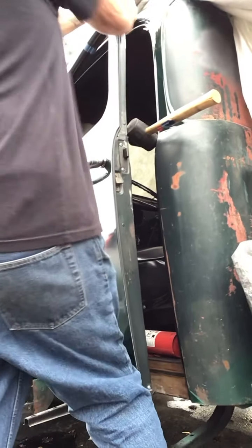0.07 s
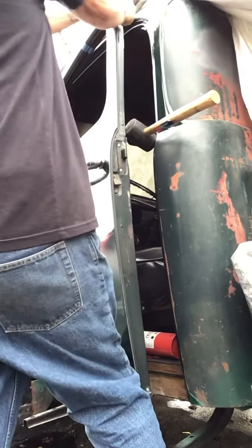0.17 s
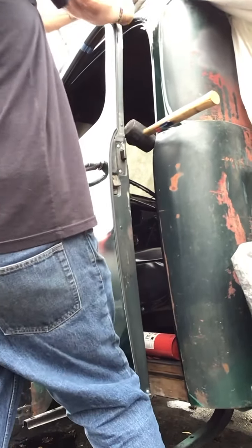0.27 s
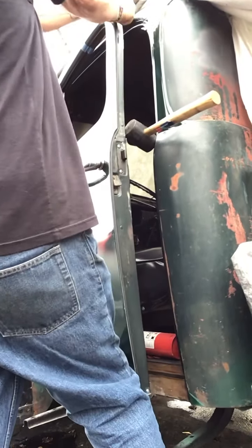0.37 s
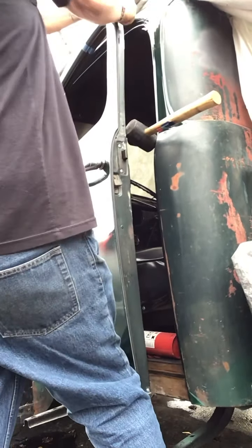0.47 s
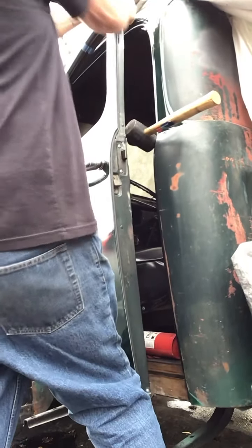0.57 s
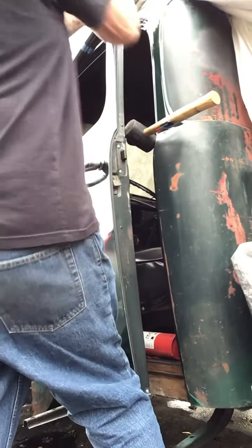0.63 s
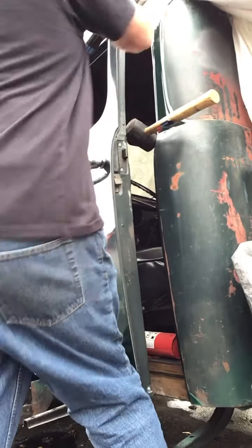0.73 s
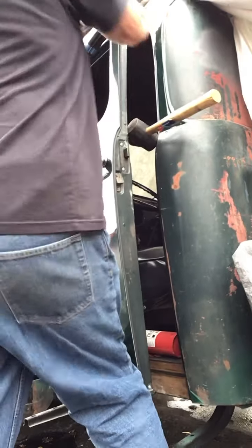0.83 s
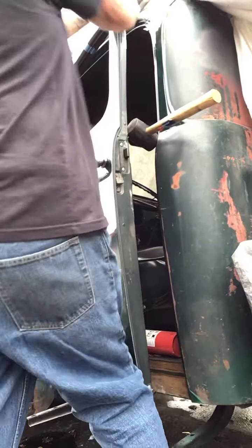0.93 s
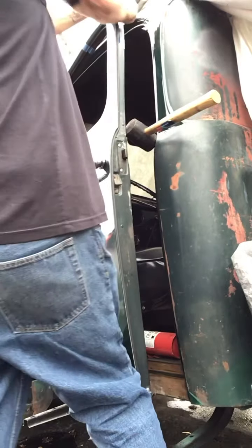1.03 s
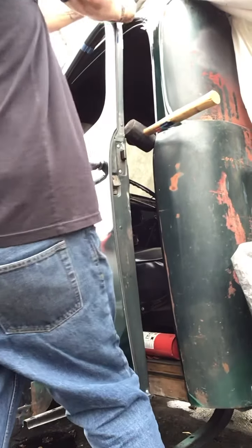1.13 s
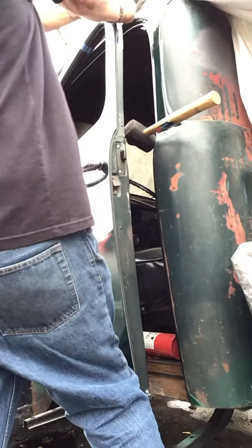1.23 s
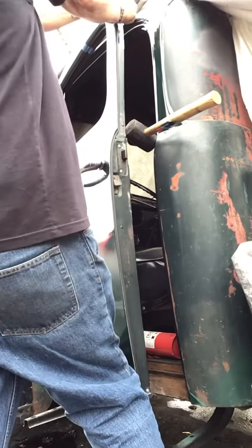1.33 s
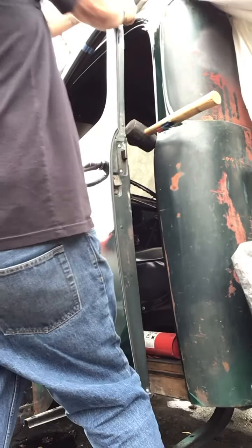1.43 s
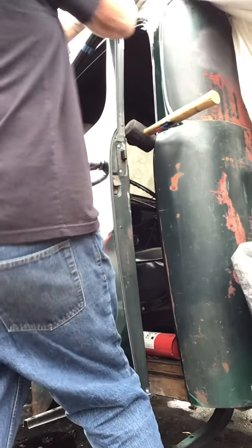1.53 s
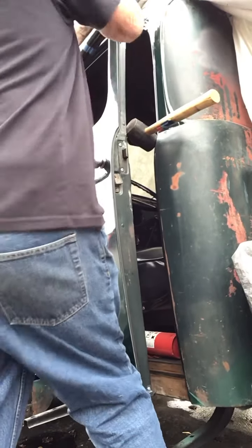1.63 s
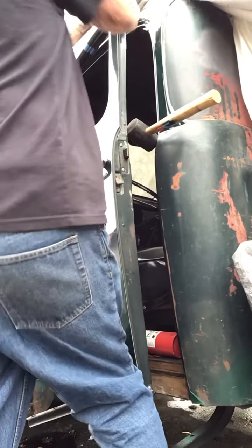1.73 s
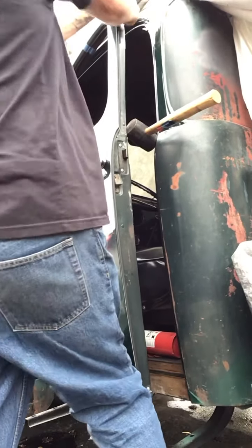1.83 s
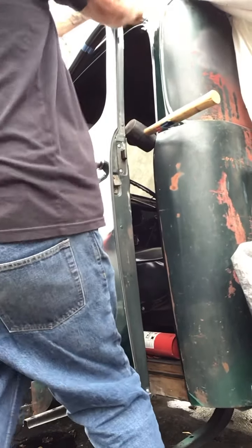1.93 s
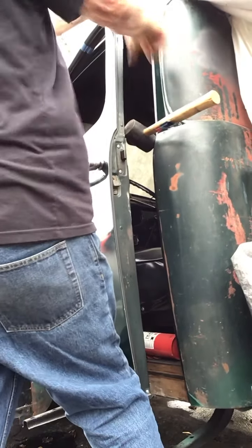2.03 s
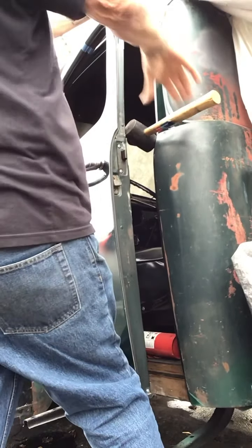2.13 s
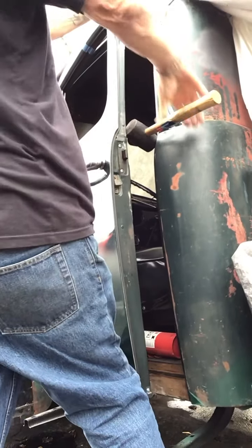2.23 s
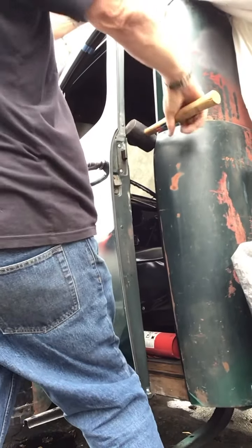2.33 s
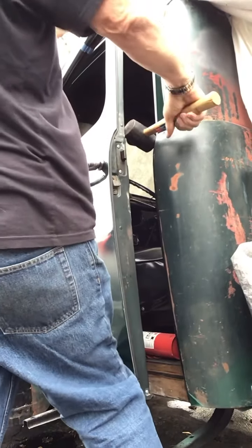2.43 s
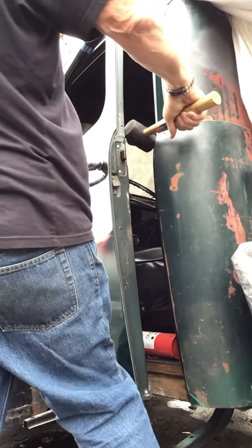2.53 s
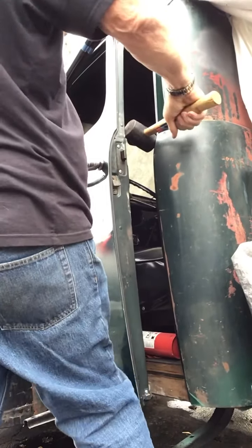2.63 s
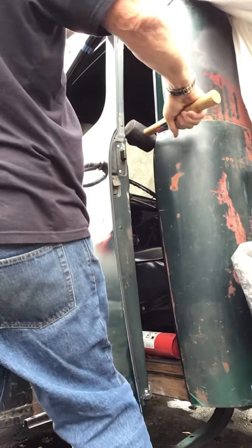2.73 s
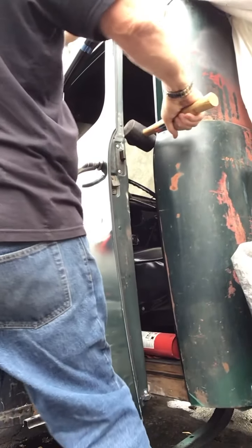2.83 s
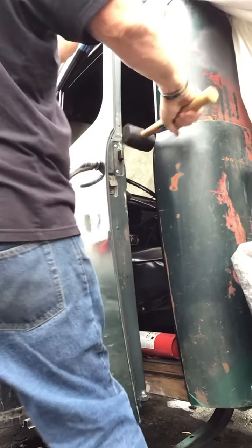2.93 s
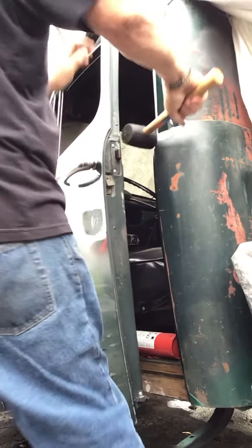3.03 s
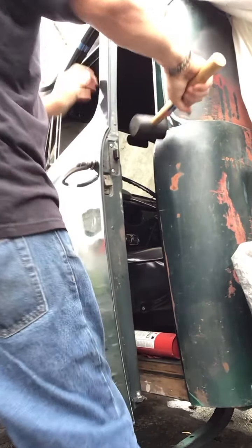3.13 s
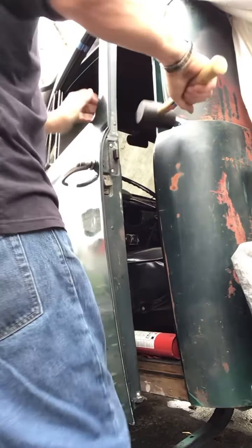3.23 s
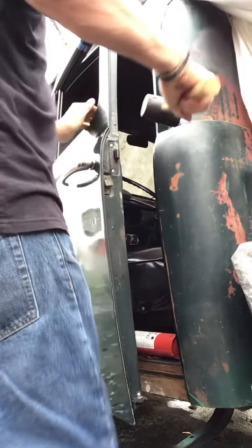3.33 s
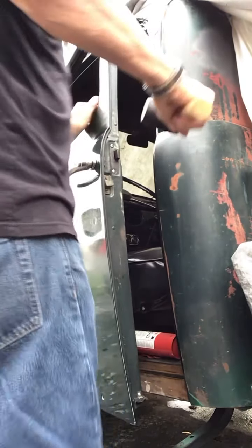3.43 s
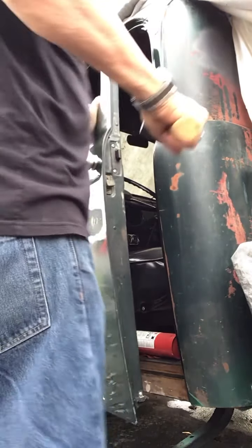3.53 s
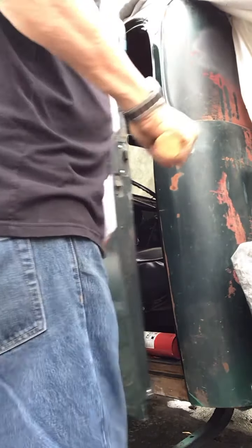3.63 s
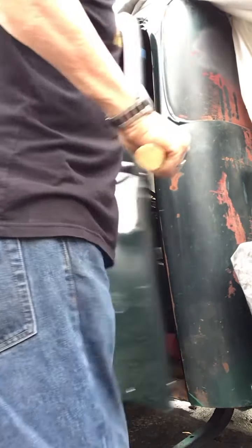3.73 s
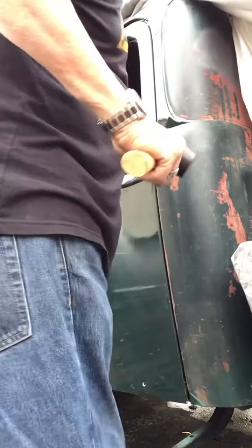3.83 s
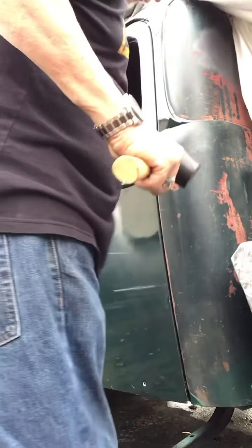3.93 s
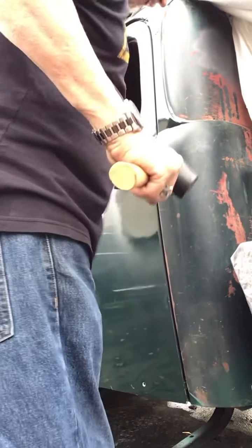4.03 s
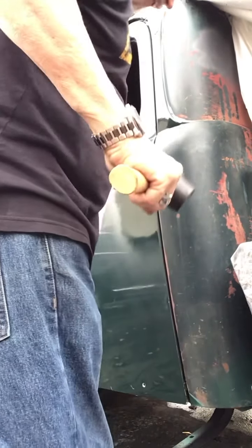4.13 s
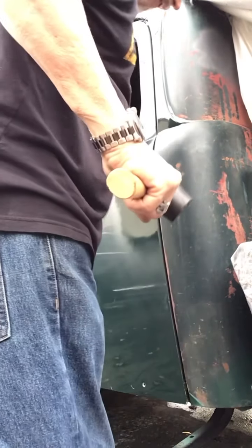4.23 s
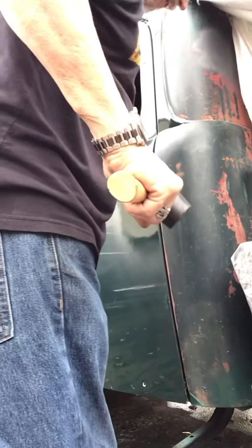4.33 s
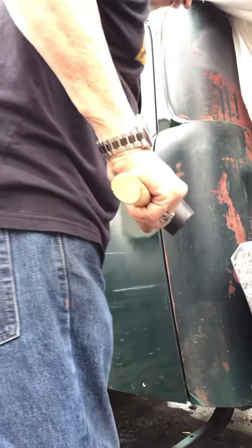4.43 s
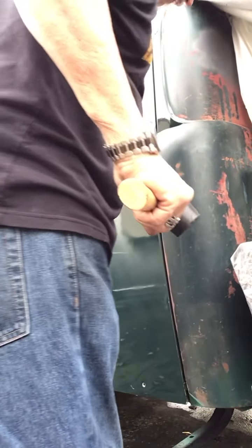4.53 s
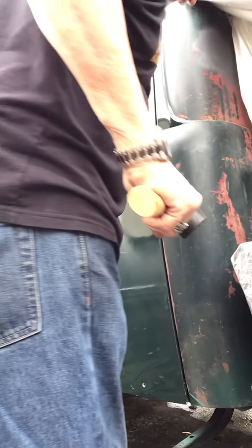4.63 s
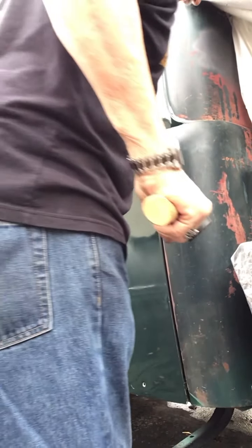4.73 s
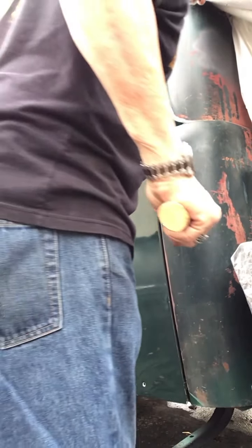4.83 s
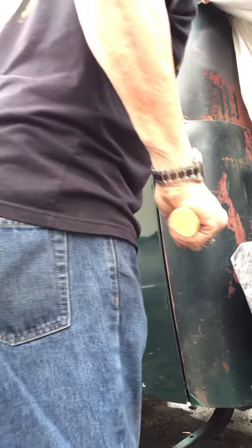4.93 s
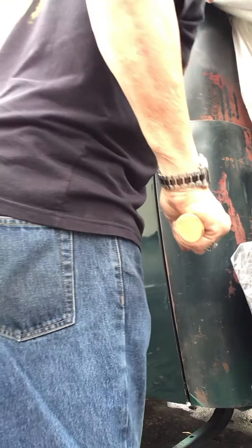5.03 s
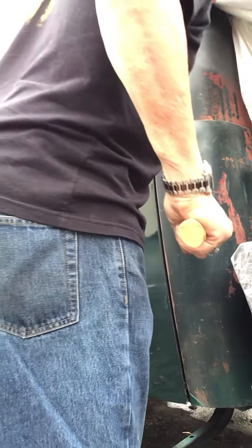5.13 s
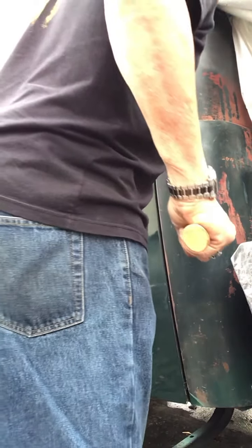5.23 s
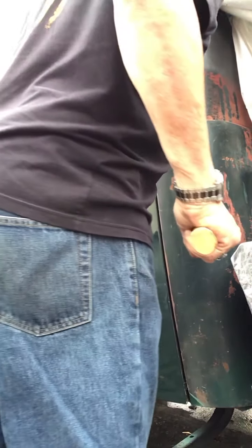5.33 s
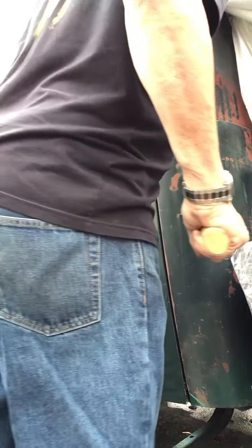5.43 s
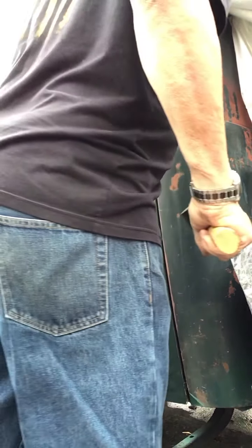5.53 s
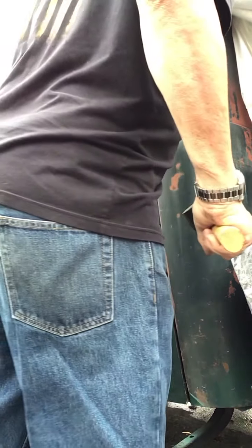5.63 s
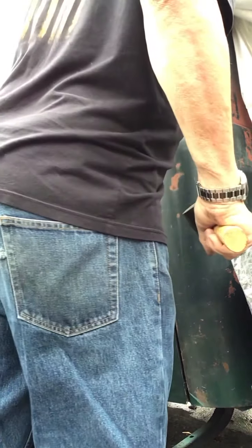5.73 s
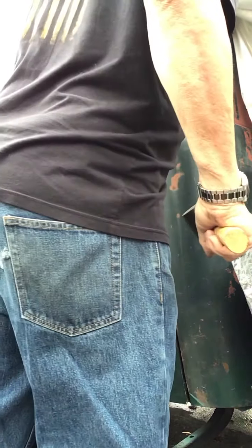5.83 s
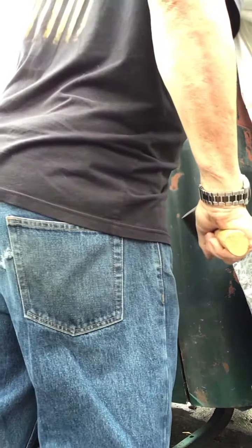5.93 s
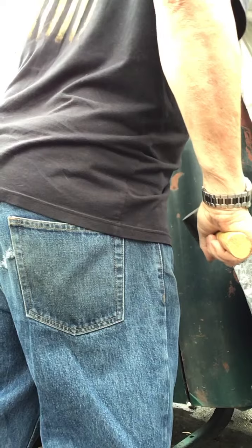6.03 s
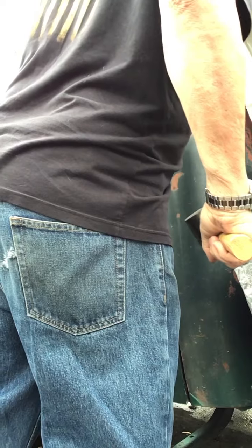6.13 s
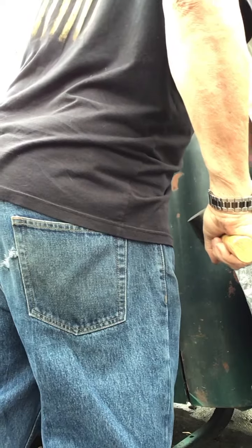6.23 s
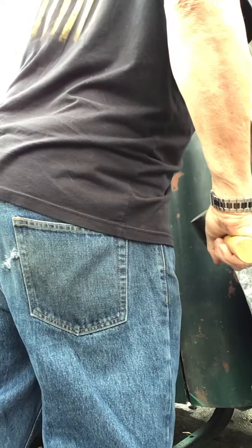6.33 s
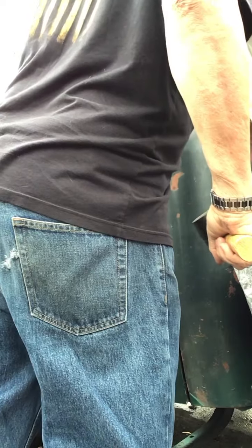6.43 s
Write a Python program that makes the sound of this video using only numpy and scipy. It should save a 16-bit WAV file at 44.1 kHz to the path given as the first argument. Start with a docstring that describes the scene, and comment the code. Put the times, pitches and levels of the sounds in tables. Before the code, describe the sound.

Phone-like close pickup of an old vehicle door. Quiet muffled bumps, frame knocks and tiny clicks come first over distant traffic, with very faint thin bird whistles. A wooden-handled mallet is lifted with a thud and scraping clicks; grit scuffs; one very loud metallic slam bursts out, several latch contacts in quick succession, hollow body resonance dying within about a second. Then near quiet, a soft bump and sparse ticks.

```python
"""Steel truck door slam

A heavy door is nudged, a mallet slides off it, a shoe scuffs on grit, then the door slams: noise clashes and
sine clangs of latch and striker, damped panel modes, a dense noise ring of the shell, rattling pings.
Traffic rumbles as filtered noise, a small bird pipes in gliding sines, a yard echoes,
and the phone's gain control ducks after the bang.
"""
import sys
import numpy as np
from scipy import signal
from scipy.fft import rfft, irfft, next_fast_len
from scipy.io import wavfile
from scipy.ndimage import uniform_filter1d, map_coordinates

SR = 44100
rng = np.random.default_rng(int(sys.argv[2]) if len(sys.argv) > 2 else 0)


def magnitude_from_level(level_db):
    """Linear magnitude for a level in decibels (20 dB per decade)."""
    exponent = np.asarray(level_db, float) / 20
    return 10 ** exponent


def put_to_file(sound):
    """Save the sound as 16-bit audio at rate SR, in the file named by the first command-line argument."""
    columns = np.atleast_2d(sound).T  # one column per channel
    safe = np.clip(columns, -1, 1)
    whole_steps = np.round(safe * 32767)
    wavfile.write(sys.argv[1], SR, whole_steps.astype(np.int16))


N = 286650

# latch and striker contacts of the slam: (t/s, clash level/dB, clang level/dB)
CONTACTS = [(3.6901, -17, -24), (3.692, -16, -7), (3.701, -15.5, -18.5), (3.7037, -11, -12),
            (3.715, -26.5, -26.5), (3.718, -19.5, -30), (3.724, -16, -28.5), (3.731, -23.5, -27)]


def unit(x):
    """Scaled to rms 1."""
    return x / np.sqrt(np.mean(x ** 2) + 1e-20)


def along(points, hz):
    """(f/Hz, value) points interpolated on a log frequency axis."""
    f, v = np.transpose(points)
    return np.interp(np.log(hz + 1), np.log(f + 1), v)


def wobble(knots_per_s):
    """Smooth random curve over the whole scene."""
    knots = rng.standard_normal(int(N * knots_per_s / SR) + 4)
    return map_coordinates(knots, [np.arange(N) * knots_per_s / SR])


def short_wobble(t, knots_per_s):
    """Smooth random curve of 40 knots over the times t."""
    return map_coordinates(rng.standard_normal(40), [t * knots_per_s])


def decay(t, t60_s):
    """Exponential decay, 60 dB in t60_s."""
    return magnitude_from_level(-60 * t / t60_s)


def onset(t, tau_s):
    """Exponential approach to 1."""
    return 1 - np.exp(-t / tau_s)


def sine(t, hz, phase=0):
    """Sine at hz with an added phase in radians."""
    return np.sin(2 * np.pi * hz * t + phase)


def filtered(x, response):
    """x times a response of frequency."""
    size = next_fast_len(len(x) + 8192)
    spectrum = rfft(x, size) * response(np.fft.rfftfreq(size, 1 / SR))
    return irfft(spectrum, size)[:len(x)]


def coloured(spectrum, size):
    """Noise of rms 1 with the given spectrum."""
    return unit(filtered(rng.standard_normal(size), lambda hz: magnitude_from_level(along(spectrum, hz))))


def band(x, centre_hz, octaves):
    """x through a band bell-shaped in log frequency, rms 1."""
    def bell(hz):
        return np.exp(-.5 * (np.log2((hz + 1) / centre_hz) / abs(octaves)) ** 2)
    return unit(filtered(x, bell))


def dying(x, t60s):
    """Each frequency of x decays at its own rate."""
    hz, t, z = signal.stft(x, SR, nperseg=256)
    z = z * magnitude_from_level(-60 * t / along(t60s, hz)[:, None])
    return signal.istft(z, SR, nperseg=256)[1][:len(x)]


def add(track, s, sound):
    """Mixes a sound into the track at time s."""
    part = track[round(s * SR):][:len(sound)]
    part += sound[:len(part)]


def street():
    """Traffic rumble in slow lumps over a smooth far wash, both filtered noise."""
    # rumble level: (t/s, level/dB)
    traffic = [(0, -39), (.45, -39.5), (0.899, -44.5), (1.6, -43), (2.2, -44.5), (3.0, -47), (3.55, -48),
               (4.95, -49.5), (5.6, -48), (6.5, -47.5)]
    # rumble spectrum: (f/Hz, relative density/dB)
    rumble_spectrum = [(15, -72.5), (25, -42), (32, -35.5), (34, -22), (41, -30.5), (59, 3), (102, 2),
                       (250, -24.5), (320, -46.5), (550, -120)]
    # far wash spectrum: (f/Hz, relative density/dB)
    air_spectrum = [(59, -30), (100, -0.5), (119, -0.5), (181, -5), (260, -10.5), (343, -5.5), (365, -13.5),
                    (784, -16.5), (854, -18), (1450, -22), (2370, -31.5), (16000, -49)]
    air_db = -52
    level_db = np.interp(np.arange(N) / SR, *np.transpose(traffic))
    lumps = magnitude_from_level(1.7 * wobble(2.8))
    rumble = magnitude_from_level(level_db) * unit(lumps * coloured(rumble_spectrum, N))
    swell_db = .6 * wobble(2.5) + .5 * wobble(11)
    return rumble + magnitude_from_level(air_db + swell_db) * coloured(air_spectrum, N)


def bird():
    """Thin sine whistles that rise, then drop faintly, with a rough pitch flutter."""
    # notes: (t/s, rise/s, first f/Hz, top f/Hz, level/dB)
    notes = [(1.883, .086, 7950, 9170, -66), (2.048, .097, 8300, 9120, -66), (2.238, .082, 8250, 9050, -67),
             (5.85, .052, 8060, 9200, -75)]
    fall_s, fall_hz, fall_db = .03, 1400, 7
    start_db = 5  # a note begins this much softer
    bend = 1.6  # the rise flattens towards the top
    out = np.zeros(N)
    for s, rise_s, first_hz, top_hz, db in notes:
        t = np.arange(0, rise_s + fall_s, 1 / SR)
        fall = np.clip((t - rise_s) / fall_s, 0, 1)
        to_go = np.clip(1 - t / rise_s, 0, 1)
        hz = top_hz - (top_hz - first_hz) * to_go ** bend - fall_hz * fall
        flutter = 1 + .011 * wobble(420)[:len(t)]
        start = np.clip(1 - 2 * t / rise_s, 0, 1)
        swell_db = 3.8 * wobble(150)[:len(t)] - fall_db * fall - start_db * start
        swell = signal.windows.tukey(len(t), .5) * magnitude_from_level(swell_db)
        whistle = np.sin(2 * np.pi * np.cumsum(hz * flutter) / SR)
        add(out, s, np.sqrt(2) * magnitude_from_level(db) * swell * whistle)
    return out


def scuffs(pings_per_s=2500, cycles=5.0, size_db=13, hiss=1.0):
    """Shoes, cloth and loose parts rub: tiny pings of scattered pitch, as of slipping grit, over a hiss."""
    # strokes: (t/s, length/s, level/dB, f/Hz, rise/s)
    strokes = [(.785, .058, -69, 5030, .017), (1.035, .014, -60.5, 7600, .004),
               (1.05, 0.14, -67, 1490, .01), (1.053, 0.065, -71.5, 8050, 0.0033),
               (1.188, .1, -73, 11000, .02), (1.818, .15, -61, 1760, 0.017),
               (1.823, 0.078, -67.5, 9100, .01), (1.89, 0.41, -69.5, 11300, .03),
               (2.351, .063, -67, 7800, .015), (3.025, .072, -56.5, 4400, 0.018),
               (3.304, .04, -58, 4730, .004), (3.538, .2, -53.5, 4770, .057),
               (3.794, .17, -56, 4500, 0.046), (4.046, .07, -60, 2820, 0.015),
               (5.242, .2, -76.5, 6000, .04), (5.255, .05, -69, 2500, 0.016), (6.02, .18, -76, 2800, .05),
               (5.715, .06, -74, 11000, 0.017), (6.322, .095, -62, 3850, 0.05),
               (6.408, .041, -62, 4080, 0.0076)]
    octaves = .8
    out, t = np.zeros(N), np.arange(200) / SR
    for s, length_s, db, hz, rise_s in strokes:
        size = round(length_s * SR)
        when, tune, loud = rng.random((3, int(pings_per_s * length_s)))
        pitch = np.clip(hz * 2 ** (1.5 * octaves * (2 * tune - 1)), 300, 15500)[:, None]
        pings = magnitude_from_level(size_db * loud[:, None] ** 3) * np.exp(-t * pitch / cycles) * sine(t, pitch)
        spots = (when * size).astype(int)[:, None] + np.arange(len(t))
        grit = unit(np.bincount(spots.ravel(), pings.ravel(), size + len(t))[:size])
        rub = unit(grit + hiss * band(rng.standard_normal(size), hz, octaves))
        u = np.linspace(0, 1, size)
        stroke = np.clip(u * length_s / rise_s, 0, 1) * np.clip((1 - u) / 0.25, 0, 1)
        add(out, s, magnitude_from_level(db) * stroke * rub)
    return out


def squeaks():
    """Narrow squeaks of door parts: thin bands of noise with soft ends."""
    # (t/s, length/s, level/dB, f/Hz, width/octaves)
    parts = [(0.725, 0.045, -66.5, 2890, .08), (1.066, .06, -64, 2006, .05), (1.07, 0.11, -69, 2330, .09),
             (1.88, .04, -64, 2560, .05), (3.68, 0.017, -45, 2860, .033), (3.83, 0.055, -49.5, 5200, .033),
             (3.827, 0.027, -45.5, 2910, .033)]
    out = np.zeros(N)
    for s, length_s, db, hz, octaves in parts:
        size = round(length_s * SR)
        squeak = band(rng.standard_normal(size), hz, octaves)
        add(out, s, magnitude_from_level(db) * signal.windows.tukey(size, .5) * squeak)
    return out


def ticks(tone=0.14):
    """Short noisy rings of mallet, metal and grit; longer rings have narrower bands and clearer tones."""
    # ticks and thuds: (t/s, peak level/dB, f/Hz, t60/s)
    listed = [(.142, -52, 13000, .01), (.144, -53.5, 5800, 0.11), (.636, -45, 9700, 0.0054),
              (.71, -61.5, 12500, .06), (.909, -58, 14200, .012), (1.446, -58, 9800, .01),
              (1.515, -57, 12400, 0.034), (1.76, -59, 7630, .012), (1.906, -57, 5230, .02),
              (2.405, -50.5, 4240, 0.014), (2.878, -32.5, 129, 0.19), (2.931, -43.5, 11350, 0.02),
              (2.967, -32.5, 125, 0.43), (2.975, -45.5, 3670, 0.065), (2.997, -53, 11000, .012),
              (3.228, -29, 3000, 0.01), (3.234, -32, 3320, 0.026), (3.243, -38, 1400, .02),
              (3.266, -37, 2700, .03), (3.282, -34, 11100, 0.044), (3.286, -35, 9500, 0.044),
              (3.296, -39, 13300, .03), (3.299, -29.5, 6700, 0.031), (3.299, -28.5, 3880, 0.022),
              (3.318, -37, 401, 0.031), (5.817, -57, 7530, 0.02), (6.371, -55.5, 9000, .012),
              (6.423, -55, 8530, .015)]
    dry_t60_s, dry_octaves = .01, 0.51  # the reference dry tick and its band
    narrowing = 0.41  # power of t60 by which the band narrows
    strays_per_s, stray_floor_db = 1.8, -63.5
    out, t = np.zeros(N), np.arange(SR // 6) / SR
    strays = []  # faint dry ticks at random times
    for when, loud, tune in rng.random((int(strays_per_s * N / SR), 3)):
        strays.append((when * N / SR, stray_floor_db + 6 * loud, 6000 * 2 ** tune, dry_t60_s))
    for s, db, hz, t60_s in listed + strays:
        octaves = dry_octaves * (dry_t60_s / t60_s) ** narrowing
        ring = band(rng.standard_normal(len(t)), hz, octaves) + tone / octaves * sine(t, hz)
        ring = ring * decay(t, t60_s) * onset(t, 0.00073)
        add(out, s, magnitude_from_level(db) * ring / np.abs(ring).max())
    return out


def drag():
    """The mallet head slides off the door edge: an uneven stick-slip rasp through edge resonances."""
    # rasp spectrum: (f/Hz, relative density/dB)
    rasp_spectrum = [(240, -40), (400, -1.5), (1090, -6.5), (2000, -6.5), (3400, -7.5), (8000, -8.5),
                     (14100, -15), (16000, -31)]
    # edge resonances: (f/Hz, width/Hz, level above the rasp/dB)
    resonances = [(1650, 98, -3), (2700, 230, 6.5), (3170, 150, 3), (4070, 230, 6)]
    start_s, length_s, level_db = 3.214, .098, -41
    slips_per_s, slip_db = 260, 2
    out, t = np.zeros(N), np.arange(round(length_s * SR)) / SR

    def edge(f):
        return 1 + sum(magnitude_from_level(db) / (1 + (2 * (f - hz) / width) ** 2) for hz, width, db in resonances)

    slips = magnitude_from_level(slip_db * wobble(2 * slips_per_s)[:len(t)])  # two knots a slip
    rasp = filtered(coloured(rasp_spectrum, len(t)), edge) * slips
    stroke = np.clip(t / 0.013, 0, 1) * np.clip((t[-1] - t) / .012, 0, 1)
    add(out, start_s, magnitude_from_level(level_db) * stroke * unit(rasp))
    return out


def knocks():
    """Knocks ring the same window-frame modes, slightly rough, under a dry rap; loud contact, faint tail."""
    # frame modes: (f/Hz, level/dB, t60/s)
    frame = [(644, 0.5, 0.23), (1040, -3, .07), (1520, -1, 0.09), (1790, -9, .06), (2054, 0.5, 0.076),
             (2410, -7.5, 0.048), (2560, -6, 0.11), (2890, -4, 0.14)]
    # knocks; the spot struck favours modes near one pitch: (t/s, level/dB, favoured f/Hz)
    strikes = [(1.052, -41.5, 1660), (1.057, -44, 620), (1.54, -56, 2660), (1.816, -49.5, 1860),
               (1.829, -38.5, 850), (1.841, -52, 1600), (1.862, -53, 1900), (1.905, -66, 2200)]
    favour_octaves = 0.44
    out, t = np.zeros(N), np.arange(SR // 5) / SR
    for s, knock_db, favoured_hz in strikes:
        ring = 0
        for hz, db, t60_s in frame:
            favour = np.exp(-.5 * (np.log2(hz / favoured_hz) / favour_octaves) ** 2)
            mode = sine(t, hz, 1.75 * short_wobble(t, 150))
            ring = ring + magnitude_from_level(db) * decay(t, t60_s) * favour * mode
        rap = .5 * decay(t, 0.03) * band(rng.standard_normal(len(t)), favoured_hz, 0.48)
        knock = ring * (0.59 + decay(t, 0.018)) + rap
        add(out, s, magnitude_from_level(knock_db) * knock * onset(t, .001))
    return out


def rattle():
    """Loose parts of window and linkage, shaken by the slam: uneven pings that die away."""
    # pitches before random detuning: (f/Hz, relative level/dB)
    loose = [(1250, 0), (1700, -2), (2400, -4), (2900, -2.5), (4070, -6), (5200, -4.5), (6400, -8)]
    pings_per_s, length_s, base_db = 540, 0.3, -27
    rattle_t60_s, ping_t60_s = .45, 0.02
    out, t = np.zeros(N), np.arange(SR // 30) / SR
    for when, which, loud, tune in rng.random((int(pings_per_s * length_s), 4)):
        hz, db = loose[int(which * len(loose))]
        delay_s = when * length_s
        detuned_hz = hz * (1 + 0.077 * (tune - .5))
        ping = decay(t, ping_t60_s) * sine(t, detuned_hz) * onset(t, 0.00056)
        ping_db = base_db + db + 11.1 * loud ** 2 - 60 * delay_s / rattle_t60_s
        add(out, CONTACTS[0][0] + delay_s, magnitude_from_level(ping_db) * ping)
    return out


def shell(ring_db=-13.5, rise_s=0.025):
    """Too many modes to count: a dense noise ring in uneven clusters that builds after first contact."""
    # ring of shell and cab: (f/Hz, relative density/dB)
    spectrum = [(59, -47.5), (100, -16.5), (202, -13), (335, -6), (784, -18), (891, -17.5), (1830, -24),
                (2000, -24.5), (4980, -32.5), (13800, -39), (16000, -48.5)]
    # decay: (f/Hz, t60/s)
    t60s = [(100, 3.3), (200, 0.84), (400, 0.61), (1000, 0.54), (4000, 0.51), (8000, 0.49), (15000, 0.44)]
    out, t = np.zeros(N), np.arange(3 * SR // 2) / SR
    z = signal.stft(coloured(spectrum, len(t)), nperseg=256)[2]
    clusters = uniform_filter1d(rng.standard_normal(z.shape), size=3, axis=0)  # over frequency
    clusters = uniform_filter1d(clusters, size=5, axis=1)  # over time
    patchy = signal.istft(z * magnitude_from_level(1.2 * unit(clusters)), nperseg=256)[1][:len(t)]
    ring = dying(unit(patchy), t60s)
    add(out, CONTACTS[0][0], magnitude_from_level(ring_db) * ring * onset(t, rise_s))
    return out


def panel(waver_rad=1.0):
    """Long contacts feed mainly low modes, damping shortens them; each wavers like a cluster of modes."""
    # modes: (f/Hz, level/dB, t60 at damping 1/s)
    modes = [(54, -4, 0.36), (69.7, -8.5, 2.25), (77.8, -4.5, .5), (90, -10.5, 1.1), (110, -12, 1),
             (134.3, -0.5, 0.6), (168, -6.5, 0.9), (184.8, -9, 0.9), (224.8, -7.5, 0.75), (257, -4, 0.55),
             (314.8, 0.5, 0.4), (363, -6, 0.72), (405, -16, 0.47), (455, -15, 0.5), (553, -17, 0.6),
             (620, -6, 0.15)]
    # blows: (t/s, level/dB, contact/s, damping by hand and seal/ratio)
    blows = [(0.589, -41, 0.0019, 1.66), (0.661, -40, 0.0017, 3.6), (0.811, -33, 0.0051, 2.3),
             (1.054, -46, 0.0012, 3.3), (1.514, -33, 0.0038, 4.4), (1.816, -44, 0.00074, 3.6),
             (2.872, -34, 0.0024, 2.35), (2.93, -41, 0.0014, 5.8), (3.702, -8.5, 0.0024, 1.93),
             (3.717, -14, 0.0039, 0.95), (3.728, -17.5, 0.0048, 1.1), (4.692, -31, 0.0059, 3.8)]
    beat_db = 2.5  # scale of each mode's swelling and sinking
    out, t = np.zeros(N), np.arange(2 * SR) / SR
    for s, blow_db, contact_s, damping in blows:
        ring = 0
        for hz, db, t60_s in modes:
            drift = waver_rad * short_wobble(t, 19) * np.clip(t / 0.095, 0, 1)
            beat = beat_db * short_wobble(t, 11) * np.clip(t / .15, 0, 1)
            level = magnitude_from_level(db + beat) * decay(t, t60_s / damping)
            softness = 1 + (hz * contact_s) ** 2
            ring = ring + level / softness * sine(t, hz, drift)
        add(out, s, magnitude_from_level(blow_db) * ring * onset(t, contact_s))
    return out


def latch():
    """Each contact is a bright noise clash and a short clang of rough latch-plate modes."""
    # clash spectrum: (f/Hz, relative density/dB)
    clash_spectrum = [(880, -34), (1500, -8.5), (3550, -14), (6430, -12), (8830, -16.5), (11900, -11.5),
                      (16000, -23)]
    # latch plate modes: (f/Hz, level before 1.5 dB random scatter/dB, t60/s)
    plate = [(780, -9, 0.055), (935, -8, 0.04), (1142, -10, 0.074), (1250, -5, 0.034), (1330, 6.5, 0.014),
             (1340, -6, 0.054), (1445, -4.5, 0.019), (1965, -11.5, .03), (3000, -20, .1),
             (4053, -17.5, 0.05), (4830, -20, 0.081)]
    out, t = np.zeros(N), np.arange(SR // 4) / SR
    for s, clash_db, clang_db in CONTACTS:
        clang = 0
        for hz, db, t60_s in plate:
            mode = sine(t, hz, 1.5 * short_wobble(t, 110))
            clang = clang + magnitude_from_level(db + rng.normal(0, 1.5)) * decay(t, t60_s) * mode
        clang = clang * onset(t, 0.00035) ** 2
        clash = onset(t, 0.00081) * decay(t, 0.03) * coloured(clash_spectrum, len(t))
        add(out, s, magnitude_from_level(clash_db) * clash + magnitude_from_level(clang_db) * clang)
    return out


def yard(x):
    """Walls and parked vehicles answer after 8 ms with a decaying noise tail."""
    # decay: (f/Hz, t60/s)
    t60s = [(200, 0.35), (2000, 0.2), (10000, 0.25)]
    tail = np.pad(dying(rng.standard_normal(SR // 2), t60s), (round(.008 * SR), 0))
    return signal.fftconvolve(x, tail / np.linalg.norm(tail))[:N]


def scene():
    """The slam excites the yard, small near sounds hardly reach it, the bird gets the largest echo share."""
    far = bird()
    small = scuffs() + squeaks() + ticks() + drag() + knocks()
    door = rattle() + shell() + panel() + latch()
    echo = yard(magnitude_from_level(-11.5) * door + magnitude_from_level(-16) * small + magnitude_from_level(-1) * far)
    return (door + small + magnitude_from_level(3.0) * far + echo + street())[None]


def roll_off(x):
    """The treble ends steeply here."""
    return signal.sosfilt(signal.butter(12, 17010, fs=SR, output="sos"), x)


def record(dry, knee_db=-30, ratio=0.58, smoothing_s=0.59):
    """Small microphone loses deep bass; gain follows loudness slowly both ways; peaks clip softly."""
    def microphone(hz):
        return signal.freqs(*signal.butter(6, 48, "high", analog=True), hz)[1]  # corner in rad/s and Hz alike

    x = filtered(dry[0], microphone)
    power = np.abs(uniform_filter1d(x ** 2, size=441))  # 10 ms mean
    over_db = np.clip(10 * np.log10(power + 1e-12) - knee_db, 0, None)
    keep = np.exp(-1 / (smoothing_s * SR))
    duck_db = ratio * signal.lfilter([1 - keep], [1, -keep], over_db)
    x = x * magnitude_from_level(-duck_db)
    x = x / (1 + np.abs(x / .95) ** 5) ** (1 / 5)
    return roll_off(x[None])


dry = scene()
out = record(dry)
put_to_file(out)
```